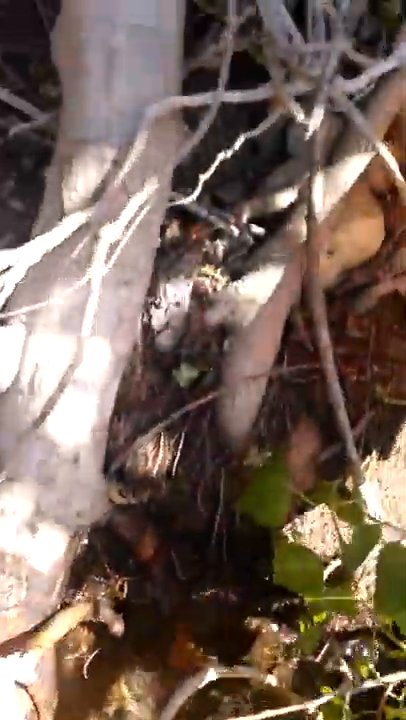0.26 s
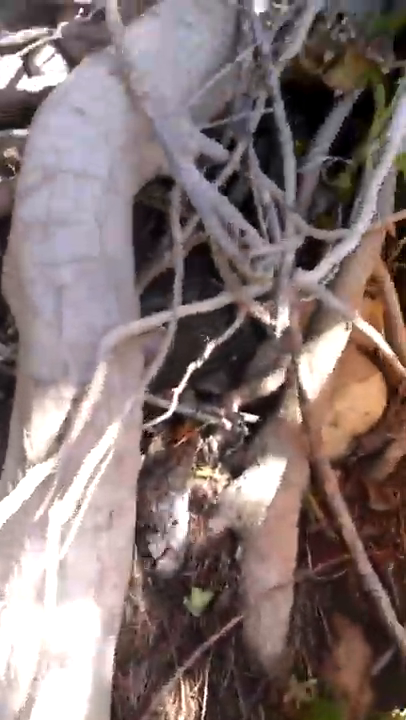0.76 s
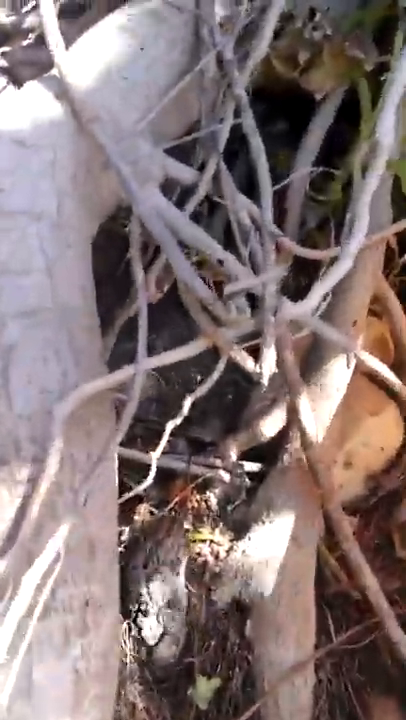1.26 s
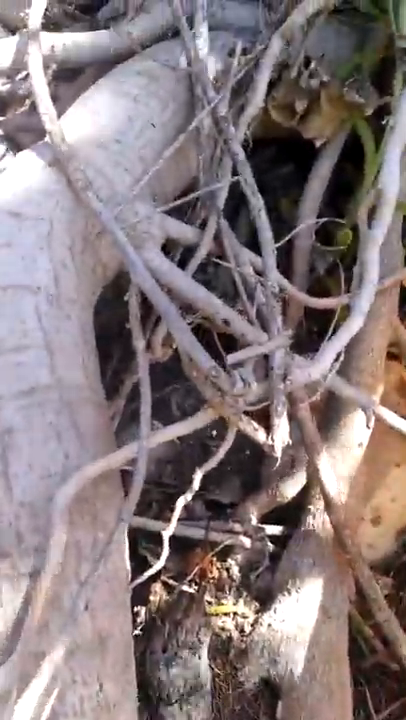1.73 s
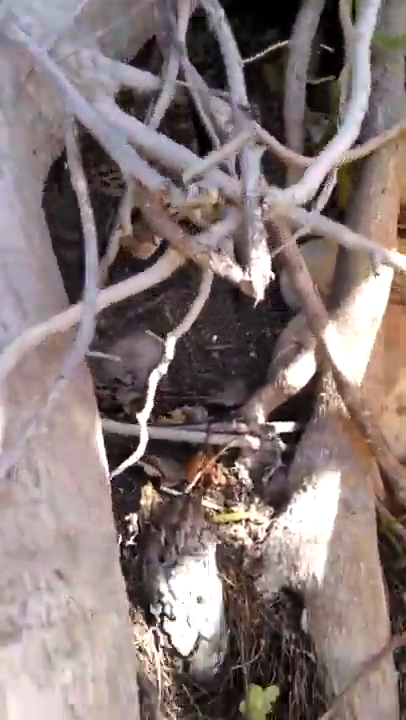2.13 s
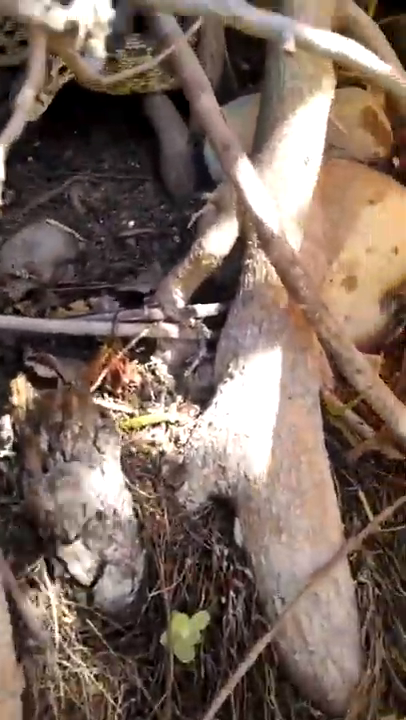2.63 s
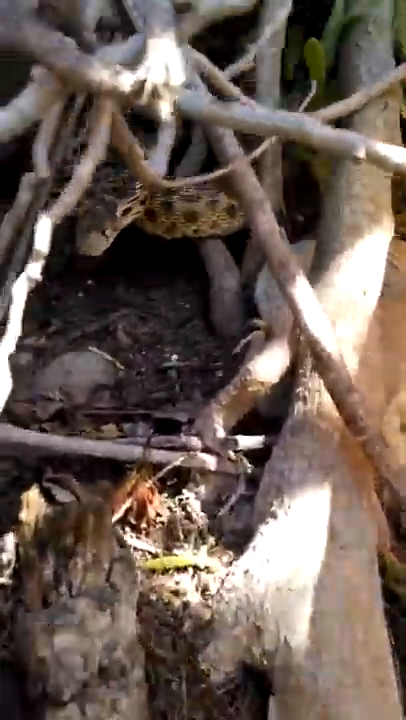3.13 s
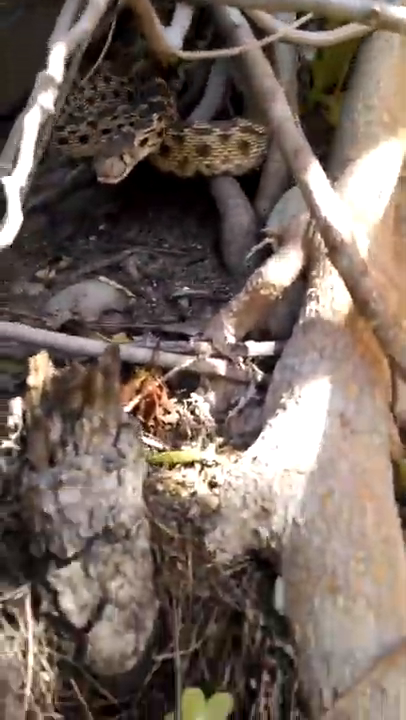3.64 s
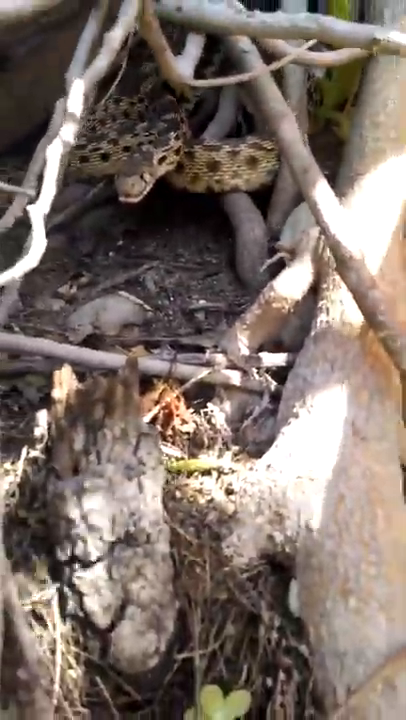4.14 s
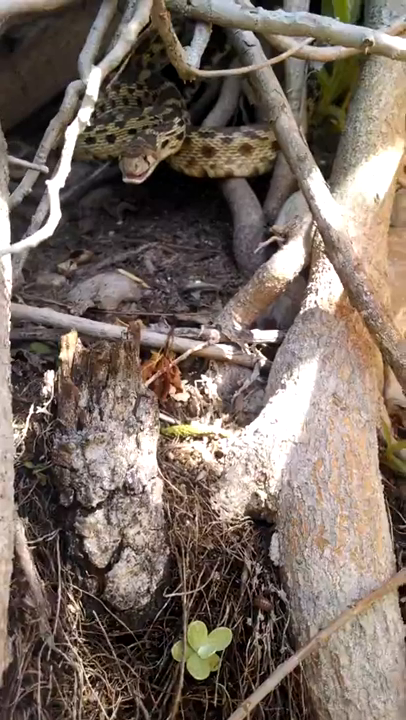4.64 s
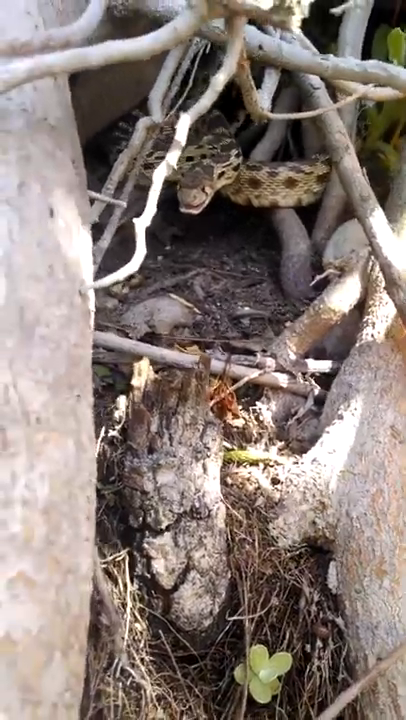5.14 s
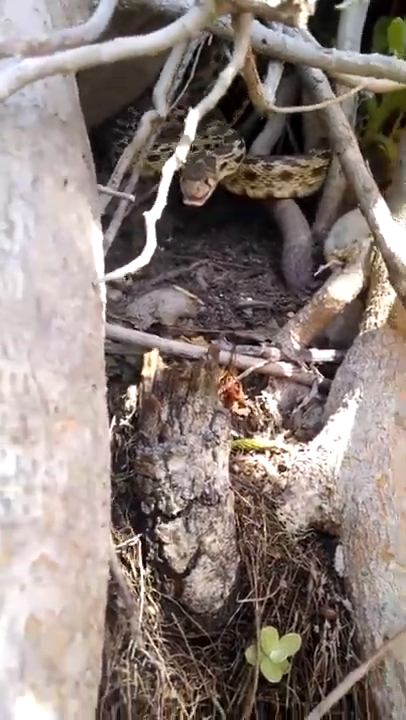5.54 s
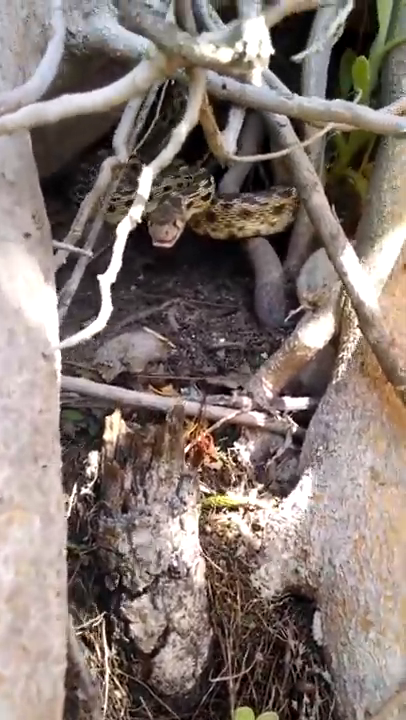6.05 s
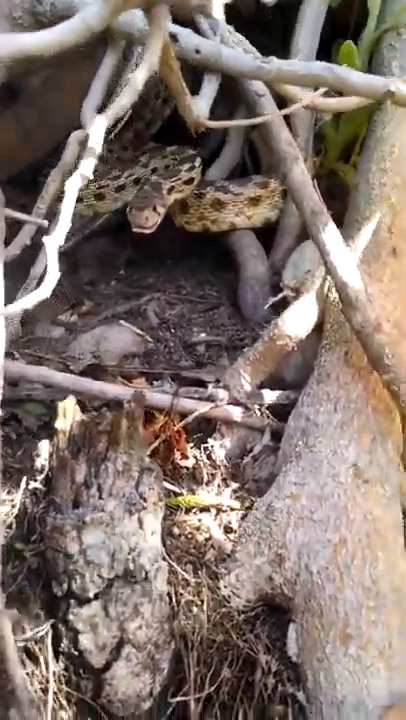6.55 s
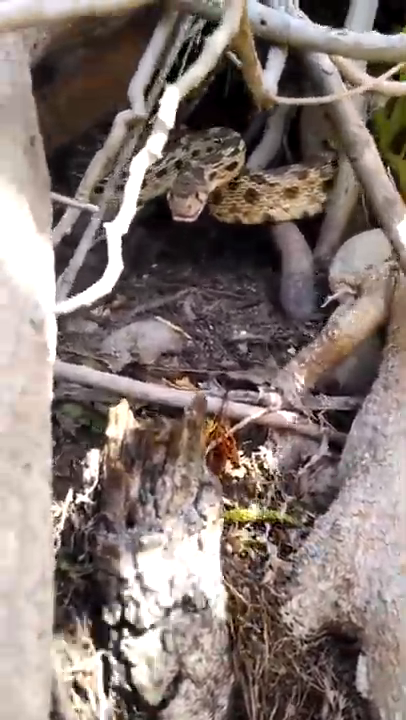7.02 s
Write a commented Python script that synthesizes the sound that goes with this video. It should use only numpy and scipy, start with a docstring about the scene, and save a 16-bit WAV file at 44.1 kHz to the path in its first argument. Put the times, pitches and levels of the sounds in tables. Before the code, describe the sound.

A defensive snake under roots breathes in with a thin airy rush, pauses very briefly, then forces out a dense, tearing hiss that builds to full strength and cuts dead. It draws air in again, quieter. Dull taps and a muffled finger rub come from the phone's case, and fluttering low wind buffets its wide stereo microphones.

```python
"""A hollow under tree roots: a cornered snake ends a breath, draws air in, forces it out in one long swelling hiss,
stops dead and draws in again. Air tearing through its narrow glottis is noise that rings the mouth. Wind buffets the
hand-held phone as eddies of low noise and quick pressure swings; sliding fingers stick and slip on its case, and
finger knocks and soft wind thumps ring its modes. The phone widens the sound of its two close microphones."""
import sys
import numpy as np
from scipy import signal
from scipy.fft import rfft, irfft, next_fast_len
from scipy.io import wavfile

SR = 44100
rng = np.random.default_rng(int(sys.argv[2]) if len(sys.argv) > 2 else 0)


def generate_wav(sig):
    """Save sig (samples, or channels by samples) to the path in sys.argv[1] as 16-bit PCM at SR."""
    pcm = np.round(np.clip(np.atleast_2d(sig).T, -1, 1) * 32767).astype(np.int16)
    wavfile.write(sys.argv[1], SR, pcm)


N = 321073
TIME = np.arange(N) / SR
TOP_HZ = 15550

# single gusts: (time [s], envelope peak of the hardest eddy [dB], decay length [s], eddy pitch [Hz])
GUSTS = [(0.118, -21, 0.051, 109), (0.334, -14, 0.018, 136), (0.369, -17, 0.011, 88),
         (0.407, -16.5, 0.016, 97), (0.481, -20, 0.028, 98), (0.564, -14, 0.022, 150),
         (0.615, -18.5, 0.046, 111), (0.702, -16.5, 0.013, 139), (0.81, -16.5, 0.033, 105),
         (0.952, -16.5, 0.021, 147), (1.014, -7, 0.04, 111), (1.085, -16, 0.016, 155),
         (1.219, -4, 0.039, 100), (1.338, -24, 0.022, 92), (1.368, -11.5, 0.12, 71),
         (1.459, -9, 0.0091, 93), (1.702, -17.5, 0.024, 86), (1.802, -13, 0.036, 139),
         (2.059, -18, 0.015, 79.6), (2.283, -17, 0.022, 88), (2.407, -15, 0.03, 91), (2.44, -15, 0.045, 92),
         (2.797, -16.5, 0.2, 76), (2.973, -12.5, 0.15, 85), (3.148, -6.5, 0.049, 89),
         (3.669, -11, 0.026, 102), (3.85, -26, 0.033, 58), (4.452, -5, 0.02, 129),
         (4.932, -10.5, 0.024, 120), (4.967, -20, 0.02, 112), (5.044, -9.5, 0.061, 74),
         (5.387, -13, 0.043, 83), (5.809, -5, 0.033, 62), (5.921, -4, 0.047, 121), (6.007, -6, 0.016, 137),
         (6.253, -2, 0.0084, 92), (6.364, -9.5, 0.0077, 110), (6.448, -1.5, 0.026, 116),
         (6.534, -12, 0.033, 75), (6.616, -6.5, 0.043, 93), (6.722, -10, 0.013, 87), (6.885, -5, 0.007, 98),
         (6.939, -3, 0.018, 123), (6.956, -5.5, 0.03, 86.6), (7.091, -4.5, 0.039, 141),
         (7.119, -12, 0.026, 93), (7.167, -1.5, 0.022, 144), (7.235, -17, 0.02, 118)]


def undb(db):
    """Decibels to gain."""
    return 10 ** (np.asarray(db) / 20)


def curves(table, times):
    """The columns of a table of (s, ..) rows, interpolated at the given times."""
    s, *columns = np.transpose(table)
    return [np.interp(times, s, column) for column in columns]


def spectrum(table, hz):
    """(Hz, value) points joined on a log-frequency axis."""
    points, values = np.transpose(table)
    return np.interp(np.log(hz + 1), np.log(points), values)


def colour(x, table):
    """Filter by a (Hz, dB) spectrum."""
    size = next_fast_len(N)
    hz = np.fft.rfftfreq(size, 1 / SR)
    return irfft(rfft(x, size) * undb(spectrum(table, hz)), size)[..., :N]


def unit(x):
    """Scale to rms 1."""
    return x / np.sqrt(np.mean(x ** 2))


def walk(rate, times):
    """Random curve of rms 1, joined from knots at rate per second."""
    knots = np.arange(0, N / SR + 1, 1 / rate)
    return unit(np.interp(times, knots, rng.standard_normal(len(knots))))


def add(track, s, sound):
    """Mix a short sound into a track at time s."""
    start = max(int(s * SR), 0)
    part = sound[:max(N - start, 0)]
    track[start:start + len(part)] += part


def bump(hz, centre_hz, width_hz):
    """A bell of height 1 around a resonance."""
    return np.exp(-(2 * (hz - centre_hz) / width_hz) ** 2)


def stroke(flow, throat, jet, mouth, hz, times, glottis_db=4, glottis_width_hz=1200):
    """Spectrum in dB of one stroke: jet noise through mouth and glottis; more flow is brighter."""
    steadiness, drift_db_per_s, glottis_hz, glide_hz_per_s = throat
    level_db, sizzle_db = curves(flow, times)
    age_s = times - flow[0][0]
    slack_db = max(row[1] for row in flow) - level_db
    resonances_db = sum(db * bump(hz, centre, width) for centre, width, db in mouth)
    shape_db = spectrum(jet, hz) + resonances_db
    rush_db = (drift_db_per_s * age_s + steadiness * slack_db) * np.interp(hz, [3000, 7000], [1, 0])
    top_db = sizzle_db * np.interp(hz, [9000, 12000], [0, 1])
    glottis = glottis_db * bump(hz, glottis_hz + glide_hz_per_s * age_s, glottis_width_hz)
    return level_db + shape_db + rush_db + top_db + glottis


def windpipe(hz, times, ripple_db=1.6, waver=0.0038, full_hz=6000, stretch_per_s=0.017):
    """Standing waves in the airway: a fine dB ripple that sinks as air is drawn in and rises as it is blown out."""
    # lungs empty: (time [s], ..)
    lungs_empty_s = [0.16, 5.89]
    # sound travel times in the airway at empty lungs: (trip [s], ..)
    airway_trips_s = (.00116, .0019, .0029, .0041)
    air_s = np.min([np.abs(times - s) for s in lungs_empty_s], axis=0)
    length = (1 + stretch_per_s * air_s) * (1 + waver * walk(5.5, times))  # relative
    ripple = sum(np.cos(2 * np.pi * hz * trip_s * length) for trip_s in airway_trips_s)
    return ripple_db * ripple * np.minimum(hz / full_hz, 1)


def wander(hz, times, wander_db=1.0, band_hz=450, per_s=3):
    """Wandering hiss colour: neighbouring treble bands swell and fade slowly on their own."""
    centres = np.arange(3000, TOP_HZ, band_hz)
    return wander_db * sum(bump(hz, centre, band_hz) * walk(per_s, times) for centre in centres)


def widen(noise, hz, times, widener_hz=2660, widener_edge=0.17, shade_reach=3, drift=0.012):
    """The widener puts alternate bands in and out of phase between channels; the case shades the left one."""
    # widener tie between channels, above 1 whole bands saturate: (frequency [Hz], signed strength)
    tie = [(220, -1.7), (450, 0.31), (800, 1.52), (1300, 1.04), (2000, 0.97), (2700, 1.44), (3650, 1.18),
           (4200, 0.64), (5350, 1.37), (6700, 0.57), (8000, 0.55), (10500, 0.67), (14000, 0.12)]
    # phone moves from far to near: (start [s], end [s])
    approach_s = (2.6, 3.4)
    # near, treble share a quarter cycle early (+) or late (-) on the left: (frequency [Hz], share [-1 to 1])
    lead = [(5500, 0.22), (7000, -0.55), (8600, -0.5), (9900, -0.31), (11000, 0.39), (12300, 0.35),
            (13500, -0.35), (15000, -0.15)]
    # lift of the microphone difference at turn 1: (frequency [Hz], lift [dB])
    widening = [(1300, -5.5), (2000, -2.5), (3100, -2), (3700, 8.5), (4300, 6.5), (4900, 0.5), (5600, 6),
                (6800, -3), (7500, -1), (8050, 2.5), (8800, 0), (14000, 2.5), (15000, -8)]
    # how much of the lift acts as the phone turns: (time [s], relative amount)
    turn = [(0, 0.16), (3, 0.46), (3.6, 1.6), (5.8, 0.6), (6.1, 0.9), (6.7, 2.76), (7.28, 1.8)]
    # full case shading from far and near: (frequency [Hz], left minus right [dB])
    shade_far = [(1500, -0.5), (3000, -0.5), (4700, 0), (7600, -4.5), (8400, -7), (9200, -6), (10300, -7),
                 (11200, -1), (12200, -6), (13600, -6), (15000, -11)]
    shade_near = [(1500, 1), (2200, -6), (3000, 0), (4000, -1), (4700, 5), (5400, -13.5), (6300, 3),
                  (7600, 2), (8400, -5.5), (9200, -7), (10300, -9), (11200, -0.5), (12200, -8), (13600, -4),
                  (15000, -2)]

    spacing_hz = widener_hz * (1 + drift * walk(4.9, times))  # bands shift as the hand sways
    bands = np.tanh(widener_edge * np.cos(2 * np.pi * hz / spacing_hz)) / np.tanh(widener_edge)
    likeness = np.clip(-spectrum(tie, hz) * bands, -1, 1)
    near = np.interp(times, approach_s, [0, 1])
    ahead = np.clip(spectrum(lead, hz), -1, 1) * near
    mid = np.sqrt(1 + likeness)
    side = np.sqrt(1 - likeness) * undb(spectrum(widening, hz) * curves(turn, times)[0])
    common = mid * noise[0]
    apart = side * (1j * ahead * noise[0] + np.sqrt(1 - ahead ** 2) * noise[1])
    shade_db = (1 - near) * spectrum(shade_far, hz) + near * spectrum(shade_near, hz)
    # shading vanishes in bands of opposite phase
    shade = undb(shade_db * np.minimum(shade_reach * (1 + likeness), 1))
    stereo = np.array([(common + apart) * shade, common - apart])
    return stereo * np.sqrt(2 / (1 + shade ** 2)) / np.hypot(mid, side)


def snake(flutter_db=0.46, flicker_db=0.78, jaw_sway=0.004, lowest_hz=150, mouth_change_s=0.12):
    """Turbulent air shaped by three strokes; the flow flutters a little and the jaw sways the resonances."""
    # airflow per stroke: (time [s], base level [dB per Hz], top treble [dB]);
    # draw_in opens with the dying end of an earlier breath out
    draw_in = [(0.0, -81.5, 0), (0.08, -84, 1), (0.16, -112.02, 9.59), (0.28, -96.5, 3.77),
               (0.55, -85.5, 3.5), (0.9, -84, 6.5), (1.7, -69.5, 2), (2.25, -70, 6), (2.5, -69.5, -1.1),
               (2.92, -74.5, 1.5), (3.03, -84, 4)]
    blow_out = [(3.04, -88.5, -3), (3.13, -79.5, -2), (3.27, -74, 2.5), (3.7, -65.5, -4.5),
                (4.2, -60.5, -6), (4.7, -57, -6), (5.15, -60.5, -1.5), (5.38, -57.5, -3.5), (5.81, -62, -3),
                (5.85, -72.5, -6.2), (5.89, -99, -2.5)]
    draw_again = [(5.89, -95, -4.53), (5.93, -76.5, -7), (6.05, -71, 0.5), (6.35, -70.5, -2),
                  (6.48, -65.5, -4), (6.72, -66.5, -5), (6.85, -63.5, -5.5), (7.03, -69.5, -6),
                  (7.28, -70.5, -5.5)]
    # throat, one row per stroke: (low rush lag [dB per dB the hiss falls], rush drift [dB/s],
    # glottis resonance at the start [Hz], its glide [Hz/s])
    throat = [(0.4083, 3.5, 8830, -235), (0.46, 0, 8650, 150), (0.59, -1.5, 8380, -38)]
    # jet turbulence per stroke: (frequency [Hz], relative level [dB])
    draw_in_jet = [(500.0, -15), (1000.0, -22), (2000.0, -29), (3600.0, -26.5), (6000.0, -16.5),
                   (7500.0, 0.5), (10000.0, -10.5), (12000.0, -12.5), (14000.0, -18.5), (15300.0, -20)]
    blow_out_jet = [(500.0, -10), (1000.0, -18), (2000.0, -14), (3600.0, -24.5), (6000.0, -19),
                    (7500.0, -2.55), (10000.0, 0.0), (12000.0, -3.3), (14000.0, -3.5), (15300.0, -12)]
    draw_again_jet = [(500.0, -15.5), (1000.0, -17), (2000.0, -21), (3600.0, -27), (6000.0, -15.5),
                      (7500.0, -3), (10000.0, -6.5), (12000.0, -1.6), (14000.0, -11.1), (15300.0, -17)]
    # mouth and hollow resonances per stroke: (centre [Hz], width [Hz], height [dB])
    draw_in_mouth = [(1350, 140, 6), (3290, 270, 8.5), (3870, 560, 5), (4920, 1400, 10), (5840, 160, 10.5),
                     (6280, 600, 7.5), (7741.6, 326.5, 0), (8270, 340, 2.5), (10900, 270, 6),
                     (11970, 455.0, 5.5), (12753.0, 447.9, 8), (13500, 322.7, -1), (14466.9, 420.6, 8)]
    blow_out_mouth = [(590, 230, 2.3), (1185, 500, 5.3), (2290, 430, 5.6), (3145, 520, 10.5),
                      (3360, 1600, 7), (3906, 143, 16.5), (4672, 670, 19.6), (5580, 950, 16),
                      (6350, 740, 7.8), (7070, 380, 7), (8000, 260, 3.5), (9000, 230, 1.4),
                      (12500, 560, 1.5), (15000, 440, 2.6)]
    draw_again_mouth = [(910, 73, 8.5), (1566, 130, 5.7), (2500, 300, 5.5), (3420, 590, 5.4),
                        (4170, 1060, 11.4), (5100, 500, 10), (5810, 510, 10.2), (6630, 350, 3.5),
                        (7950, 400, 6.5), (9100, 680, 6), (12250, 460, 4.4), (13770, 380, 4.5),
                        (14440, 420, 8)]
    # faint outdoor air behind the hiss: (frequency [Hz], level [dB per Hz])
    air = [(500, -99), (1000, -103), (2000, -102.5), (4500, -106), (8000, -105), (14000, -111)]

    white = rng.standard_normal((2, N)) * np.sqrt(SR / 2)  # 0 dB per Hz
    hz, times, noise = signal.stft(white, SR, nperseg=768)
    hz = hz[:, None]
    swayed_hz = hz * (1 + jaw_sway * walk(4, times))
    draw = stroke(draw_in, throat[0], draw_in_jet, draw_in_mouth, swayed_hz, times)
    blow = stroke(blow_out, throat[1], blow_out_jet, blow_out_mouth, swayed_hz, times)
    again = stroke(draw_again, throat[2], draw_again_jet, draw_again_mouth, swayed_hz, times)
    # the mouth takes mouth_change_s to reshape for blowing out
    blowing = np.clip((times - blow_out[0][0]) / mouth_change_s + .5, 0, 1)
    db = np.where(times < draw_again[0][0], (1 - blowing) * draw + blowing * blow, again)
    db = db + windpipe(hz, times)
    db = db + flutter_db * walk(22, times) + flicker_db * walk(90, times)
    # broad bands drift slowly, narrow strands more quickly
    db = db + wander(hz, times) + wander(hz, times, wander_db=3.05, band_hz=170, per_s=4)
    low_cut = hz ** 2 / (hz ** 2 + lowest_hz ** 2)
    gain = np.hypot(undb(db), undb(spectrum(air, hz))) * low_cut
    return signal.istft(widen(noise, hz, times) * gain, SR)[1][:, :N]


def gusts(body_db=-10, rise_share=0.53):
    """Gust turbulence, body_db against the hardest eddy; rises in rise_share of its decay length."""
    times = TIME[::64]
    power = 0
    for s, db, length_s, _ in GUSTS:
        away = np.maximum(times - s, (s - times) / rise_share) / length_s
        power = power + (undb(db + body_db) * np.exp(-away)) ** 2
    return np.interp(TIME, times, np.sqrt(power))


def rumble(flurry_db, swirl_flurry_db=3, gust_swirl_db=8.5):
    """Breeze and gusts drive slow and fast eddies in shared flurries; the fast ones are more fitful."""
    # slow eddies: (frequency [Hz], relative level [dB])
    wind_colour = [(12, -20), (25, -9.5), (55, 1), (100, 1.5), (150, -8), (210, -16.5), (300, -34.5),
                   (430, -51), (700, -50), (1500, -105)]
    # flutter of small fast eddies: (frequency [Hz], relative level [dB])
    swirl_colour = [(80, 3.5), (170, 7), (260, 1), (380, -12), (550, -24.5), (900, -46), (1600, -82)]
    # breeze at the microphones: (time [s], relative level [dB], fast eddies against slow [dB])
    breeze_levels = [(0, -62, -9), (.05, -68, -26), (.1, -41, -8.5), (.9, -32, -12), (1.35, -25.5, -26),
                     (1.95, -31, -16.5), (2.4, -25, -23), (3.1, -30, -38), (3.8, -27.5, -33),
                     (4.25, -33.5, -24), (4.65, -34, -23), (4.9, -24.5, -11.5), (5.3, -31.5, -34),
                     (5.8, -28.5, -27), (6.1, -23.5, -14), (6.7, -20, -15), (7.28, -17, -13.5)]

    flurries = undb(flurry_db * walk(55, TIME))
    slow = unit(colour(rng.standard_normal(N) * flurries, wind_colour))
    fast = unit(colour(rng.standard_normal(N) * flurries, swirl_colour))
    fast = unit(fast * undb(swirl_flurry_db * walk(40, TIME)))
    breeze, swirl = undb(curves(breeze_levels, TIME))
    gust = gusts()
    slow_level = np.hypot(breeze, gust)
    # gusts break into more small eddies than the breeze does
    fast_level = swirl * np.hypot(breeze, undb(gust_swirl_db) * gust)
    return slow * slow_level + fast * fast_level


def buffets(eddy_cycles=0.39):
    """The hardest eddy of each gust is a quick swing of pressure, quicker when it is small."""
    t = np.arange(-SR // 40, SR // 40) / SR
    hits = np.zeros(N)
    for (s, db, _, eddy_hz), phase_turns in zip(GUSTS, rng.random(len(GUSTS))):
        cycles = eddy_hz * t
        envelope = np.hanning(len(t)) / (1 + (cycles / eddy_cycles) ** 2)
        swing = np.cos(2 * np.pi * (cycles + phase_turns)) * envelope
        add(hits, s + t[0], undb(db) * swing)
    return hits


def wind(flurry_db=3.0, wind_db=-1, lopsided=0.19):
    """Eddies hit the microphones; the widener turns nearly all of their rumble into opposite phase."""
    # rumble that both microphones have in common: (frequency [Hz], share [dB])
    wind_common = [(30, -9.5), (100, -14.5), (200, -8), (320, -4.5), (500, -2)]
    hits = buffets()
    side = undb(wind_db) * rumble(flurry_db) + hits
    mid = undb(wind_db) * colour(rumble(flurry_db), wind_common) + lopsided * hits
    # strongest gusts are rounded off softly
    return .8 * np.tanh(np.array([mid + side, mid - side]) / .8)


def rub(slips_per_s=260, spread_db=1.0):
    """A finger sliding over the case: skin sticks and slips in many tiny uneven steps."""
    # slide: (time [s], level [dB])
    rub_levels = [(0, -73.5), (1.0, -79), (1.8, -75), (2.1, -52.5), (2.5, -52), (2.85, -42), (3.1, -45),
                  (3.4, -51.5), (3.8, -70)]
    # dull scrape: (frequency [Hz], relative level [dB])
    rub_colour = [(150, 2), (300, 9), (450, 10), (700, 6), (950, -6.5), (1800, -8.5), (3000, -97)]
    slips = (rng.random((2, N)) < slips_per_s / SR) * rng.standard_normal((2, N))
    slips = slips * undb(spread_db * walk(29.75, TIME))
    return unit(colour(slips, rub_colour)) * undb(curves(rub_levels, TIME)[0])


def knocks(scatter_db=3.4, rattle=0.072, rattle_s=0.0057, rebound=0.39, rebound_s=0.0038, side_db=-9,
           contact_db_per_octave=8, body_s=0.008):
    """Each knock or soft wind thump rings case modes near its favoured pitch most, rebounds once, rattles briefly."""
    # knocks and thumps: (time [s], mid rms over the first body_s before damping [dB], favoured pitch [Hz])
    knock_list = [(0.556, -50, 350), (0.682, -56, 1800), (0.818, -48, 330), (2.267, -44, 900),
                  (2.709, -37.5, 650), (2.825, -36.5, 480), (2.849, -27.5, 620), (2.880, -42, 650),
                  (2.9123, -32.5, 700), (2.974, -41.5, 550), (3.025, -43, 550), (3.158, -37.5, 453),
                  (4.515, -32.5, 850), (4.581, -29.5, 750), (4.649, -32.5, 850), (4.692, -30, 1100),
                  (4.7102, -23.5, 400), (5.0272, -19, 470), (5.9405, -22.5, 810)]
    # case modes: (nominal frequency [Hz], nominal level [dB], t60 [s])
    case_modes = [(220, -2, 0.055), (431, -1.5, 0.048), (571, -2.5, 0.049), (682, 2.5, 0.032),
                  (784, 0, 0.029), (1055, 0, 0.022), (1270, -1.5, 0.018), (1640, -3, 0.016),
                  (1820, -2, 0.022)]
    # steep treble cut that keeps the knocks dull: (frequency [Hz], gain [dB])
    case_damping = [(1850, 0), (2300, -11), (2700, -36)]

    t = np.arange(SR // 10) / SR
    hz, mode_db, t60_s = np.transpose(case_modes)[:, :, None]
    decay = np.exp(-np.log(1000) * t / t60_s)
    mid, side = np.zeros((2, N))
    for s, db, pitch_hz in knock_list:
        contact_db = -contact_db_per_octave * np.abs(np.log2(hz / pitch_hz))
        for track, share_db in ((mid, 0), (side, side_db)):
            size, detune = rng.standard_normal((2, len(case_modes), 1))
            gains = undb(mode_db + scatter_db * size + contact_db)
            # the microphones sit on different parts of the case and feel each mode differently
            signs = 1 if track is mid else (-1) ** np.arange(len(case_modes))[:, None]
            tones = np.sin(2 * np.pi * hz * (1 + 0.029 * detune) * t)
            ring = np.sum(signs * gains * tones * decay, axis=0)
            push = (t == 0) + rattle * rng.standard_normal(len(t)) * np.exp(-t / rattle_s)
            push[int(rebound_s * SR * rng.uniform(0.7, 1.3))] += rebound
            ring = signal.fftconvolve(push, ring)[:len(t)]
            add(track, s, undb(db + share_db) * ring / np.std(ring[t < body_s]))
    return colour(np.array([mid + side, mid - side]), case_damping)


def scene():
    """The snake, with wind and fingers on the phone."""
    return snake() + wind() + rub() + knocks()


def record(dry):
    """The phone cuts the top steeply."""
    top_cut = signal.ellip(10, .2, 80, TOP_HZ, fs=SR, output="sos")
    return signal.sosfilt(top_cut, dry)


dry = scene()
out = record(dry)
generate_wav(out)
```